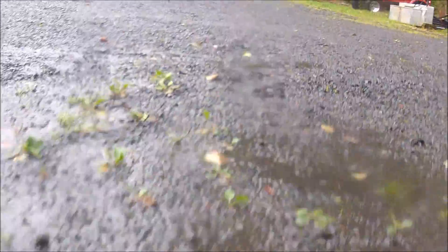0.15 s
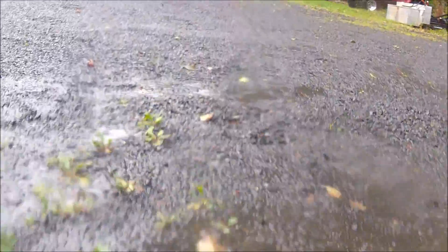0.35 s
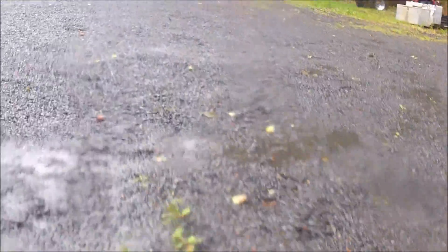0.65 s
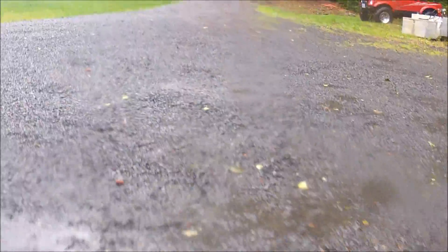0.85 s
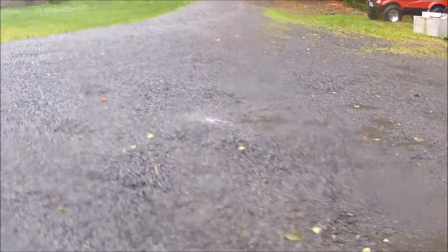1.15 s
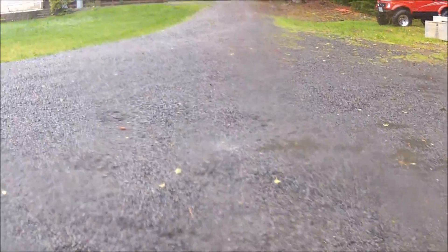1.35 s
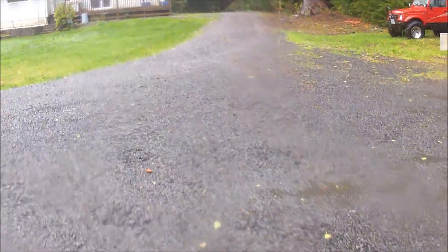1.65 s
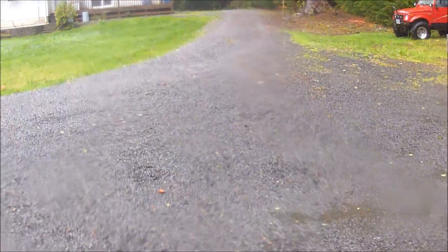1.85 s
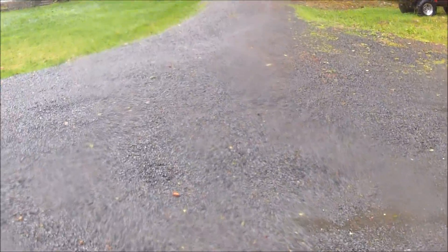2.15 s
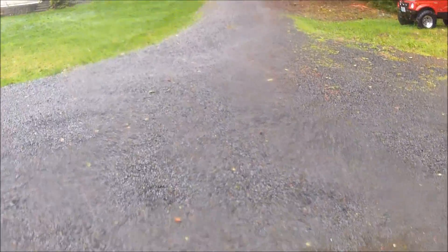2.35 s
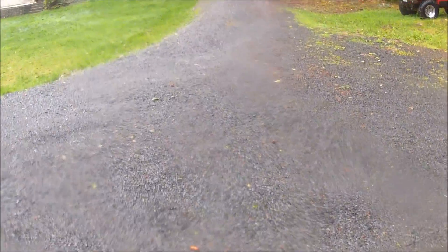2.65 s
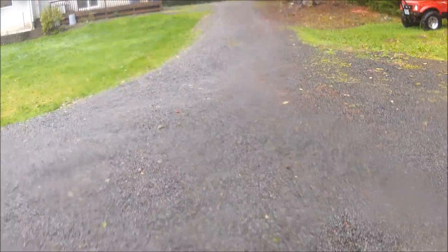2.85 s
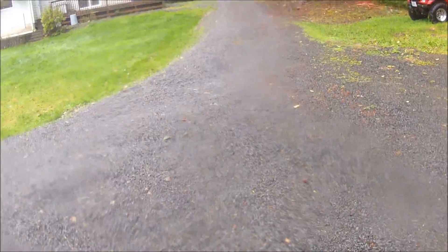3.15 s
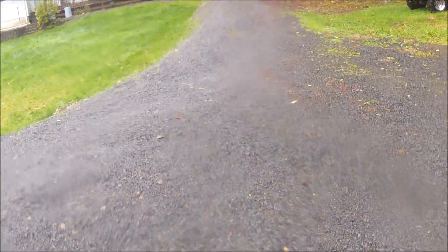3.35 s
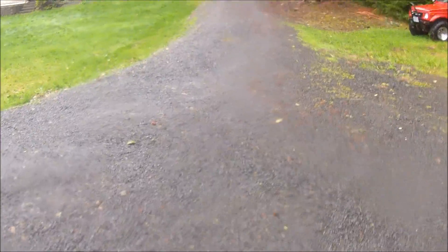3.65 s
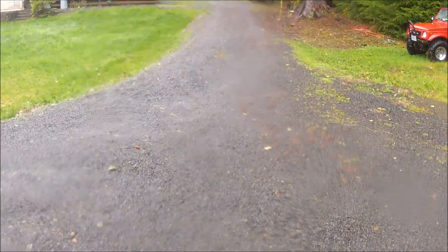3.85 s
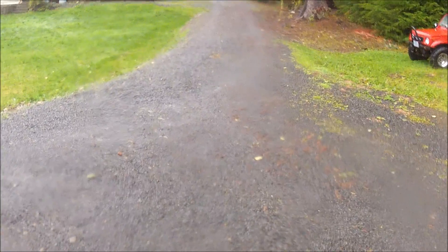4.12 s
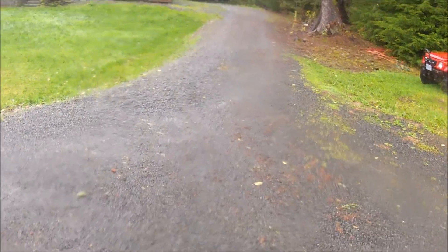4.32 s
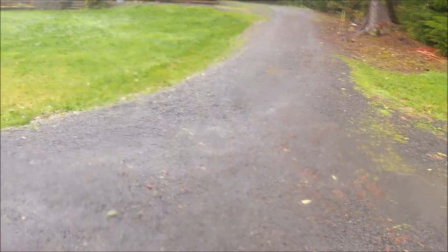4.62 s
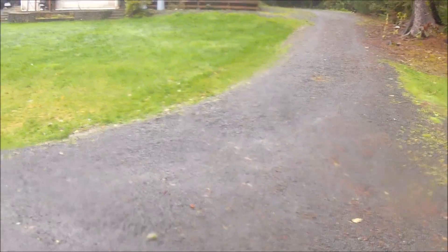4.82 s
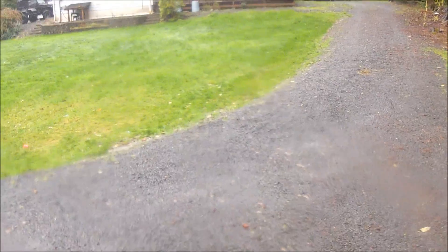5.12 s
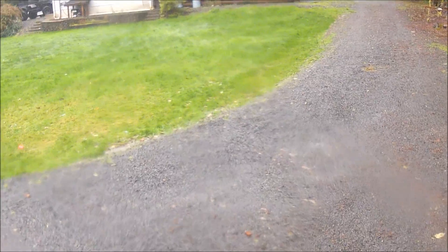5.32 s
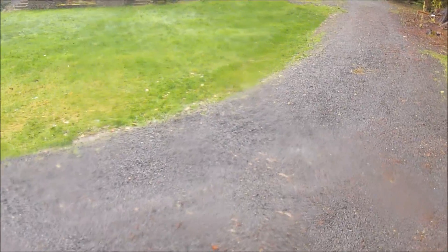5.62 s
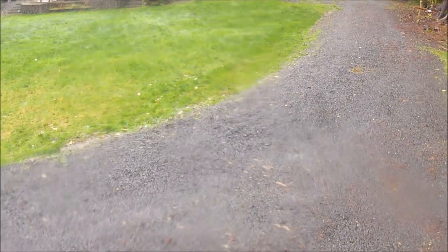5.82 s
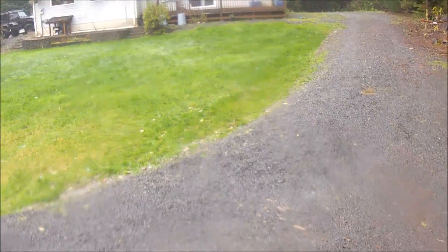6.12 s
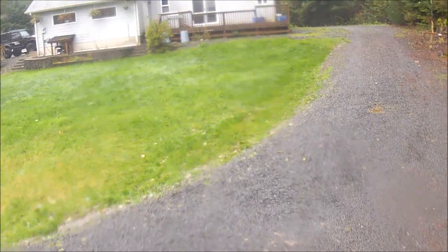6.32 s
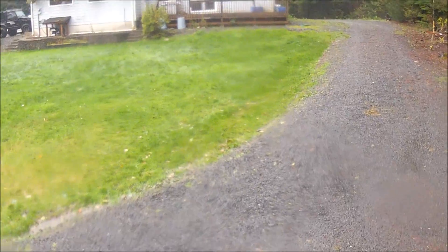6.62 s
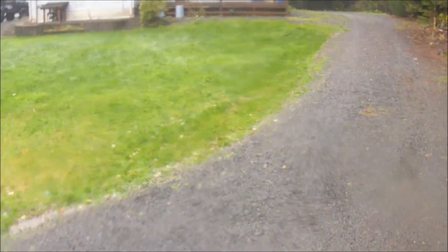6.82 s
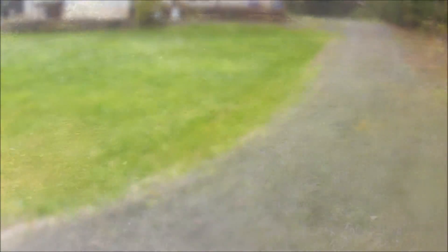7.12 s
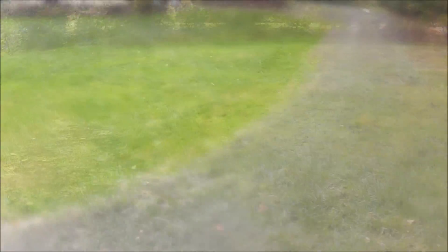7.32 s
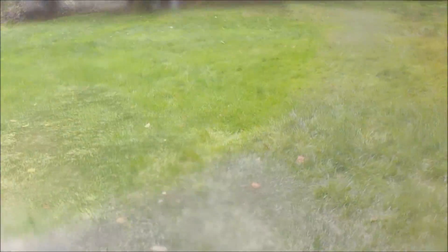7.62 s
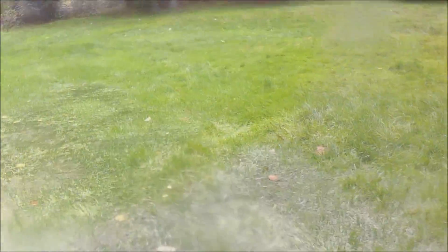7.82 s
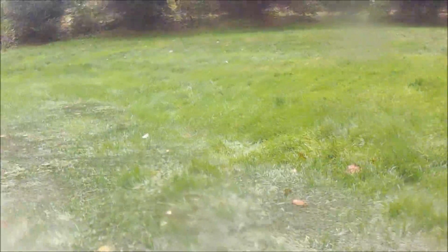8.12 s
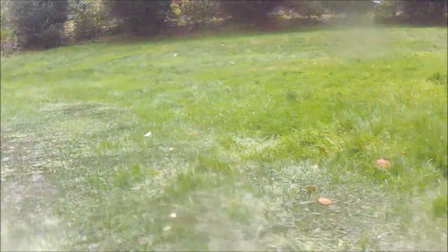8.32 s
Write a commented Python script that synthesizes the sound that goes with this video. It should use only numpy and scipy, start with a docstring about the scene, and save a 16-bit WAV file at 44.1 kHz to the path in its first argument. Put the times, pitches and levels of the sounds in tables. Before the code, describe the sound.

A small multirotor drone hums, rasps and whines right beside a tiny lo-fi microphone, its pitch wavering, then fades much quieter before lifting slightly.

```python
"""A small quadcopter hums, rasps and whines close by, heard through a tiny low-rate microphone.
Four rotors hum and beat against each other, and their blades chop noise into a rasp and a hiss.
Each motor whines at 42 times its turning rate; short corrections of tilt bend the pitch of the whines.
Holding each of 12000 samples a second mirrors the whine and the rasp into the treble."""
import sys
import numpy as np
from scipy import signal
from scipy.fft import rfft, irfft, next_fast_len
from scipy.io import wavfile
from scipy.ndimage import uniform_filter1d

SR = 44100
rng = np.random.default_rng(int(sys.argv[2]) if len(sys.argv) > 2 else 0)


def digitize_waveform(pressure):
    """Quantize a signal to 16-bit integers and store it at the path in sys.argv[1].

    Rows of a 2-D input are taken as channels; values are limited to [-1, 1].
    """
    field = np.atleast_2d(pressure).T
    bounded = np.clip(field, -1, 1)
    quanta = np.round(bounded * 32767).astype(np.int16)
    wavfile.write(sys.argv[1], SR, quanta)


N = 373527
TIME = np.arange(N) / SR   # s
WHINE_ORDER = 42   # whine cycles per turn of the rotor


def from_db(db):
    """Turn decibels into a gain."""
    return 10 ** (np.asarray(db) / 20)


def rms_one(x):
    """Scale a sound to an rms level of 1."""
    return x / np.sqrt(np.mean(x ** 2) + 1e-20)


def evened(x, seconds):
    """Hold the slow level of a sound near rms 1, leaving its faster swells."""
    power = uniform_filter1d(x * x, size=int(seconds * SR), mode="reflect")
    return x / np.sqrt(power + 1e-6)


def in_time(rows):
    """Read the columns of a timed table at every sample, with rounded corners."""
    seconds, *columns = np.transpose(rows)
    curves = [np.interp(TIME, seconds, column) for column in columns]
    return [uniform_filter1d(curve, size=1300, mode="nearest") for curve in curves]


def bump(top_s, length_s):
    """Rise smoothly to 1 at the given time and fall back, over the given length."""
    return np.interp(TIME, top_s + length_s * np.linspace(-.5, .5, 65), np.hanning(65))


def drift(rate):
    """Wander by chance with a spread of 1, mostly slower than the given rate in Hz."""
    step = 40   # samples between the drawn points
    r = np.exp(-2 * np.pi * rate * step / SR)
    draws = rng.standard_normal(N // step + 2002)
    slow = signal.lfilter([1], [1, -2 * r, r * r], draws)[2000:]   # skip the filter's start
    return np.interp(np.arange(N) / step, np.arange(len(slow)), rms_one(slow))


def coloured_noise(spectrum):
    """Steady noise whose strength at each pitch follows the given spectrum; rms 1."""
    size = next_fast_len(N)
    hz, db = np.transpose(spectrum)
    bins = np.maximum(np.arange(size // 2 + 1) * SR / size, 1)
    gain = from_db(np.interp(np.log(bins), np.log(hz), db))
    gain = gain / (1 + (bins / hz[-1] / 1.15) ** 16)   # fade out above the last row
    return rms_one(irfft(rfft(rng.standard_normal(size)) * gain, size)[:N])


def resonance(x, hz, width):
    """Ring like a two-pole resonator whose gain is 1 at its peak."""
    r = np.exp(-np.pi * width / SR)
    feedback = [1, -2 * r * np.cos(2 * np.pi * hz / SR), r * r]
    return signal.lfilter(np.array([1, 0, -1]) * (1 - r * r) / 2, feedback, x)


def tilt_corrections():
    """Extra speed of rotors A, B and C: each correction raises or lowers the speeds of some rotors."""
    # short corrections of tilt: (time of the top [s], length [s], extra of A, B, C [turns/s])
    tilts = [(0.14, 0.4, 5.4, -1.5, 0.7), (0.37, 0.33, 7.2, -1.0, 0.3), (0.62, 0.37, 6.2, -2.1, 0.7),
             (0.93, 0.58, 4.4, -1.6, 3.5), (1.28, 0.37, 5.4, -2.9, 1.5), (1.59, 0.49, 3.9, -1.2, 0.1),
             (1.97, 0.41, 3.8, 0.4, 1.4), (2.19, 0.35, 4.9, -0.4, -0.7), (2.53, 0.34, 0.0, 2.7, -3.9),
             (2.84, 0.36, 5.5, 1.1, -0.2), (3.15, 0.39, 6.7, -1.7, 1.3), (3.42, 0.31, 6.4, -1.5, 1.4),
             (3.66, 0.34, 5.7, 0.6, -1.1), (3.94, 0.28, 3.7, -0.9, -0.2), (4.23, 0.67, 4.6, -0.4, -0.3),
             (4.64, 0.48, 6.2, -4.1, -1.3), (5.99, 0.41, 2.0, -0.4, 0.5), (6.26, 0.34, 1.0, 0.4, 0.7),
             (6.58, 0.39, 1.3, -0.2, -0.9), (6.91, 0.39, 1.8, 0.3, 0.1), (7.14, 0.29, 2.2, 0.4, -0.3),
             (7.85, 0.3, 2.2, -0.1, 0.6), (8.05, 0.3, -1.5, 0.0, -0.4)]
    return sum(np.outer(extra, bump(top_s, length_s)) for top_s, length_s, *extra in tilts)


def rotor_speeds(extra):
    """Add the corrections to the cruising speeds; D shares the load and runs between A and B."""
    # cruising speed of the nearest rotor, A: (time [s], speed [turns/s])
    cruise_a = [(0.0, 82.4), (0.3, 85.2), (0.75, 81.9), (1.4, 82.9), (1.8, 80.8), (2.5, 81.4), (3.3, 81.7),
                (4.4, 82.5), (4.85, 80.6), (5.25, 81.6), (5.7, 85.7), (6.2, 86.5), (6.7, 84.8), (7.3, 84.7),
                (7.65, 89.5), (8.47, 91.9)]
    # cruising speed of the opposite rotor, B: (time [s], speed [turns/s])
    cruise_b = [(0.0, 87.2), (0.35, 82.5), (1.05, 84.9), (1.7, 81.0), (2.1, 83.4), (2.35, 75.2),
                (2.72, 73.6), (3.27, 83.1), (3.85, 79.1), (4.07, 81.3), (4.32, 72.7), (4.5, 77.5),
                (4.75, 73.5), (5.35, 82.9), (7.5, 80.9), (7.7, 85.4), (8.15, 81.9), (8.47, 83.6)]
    # cruising speed of rotor C: (time [s], speed [turns/s])
    cruise_c = [(0.0, 83.2), (0.73, 75.9), (1.15, 78.1), (1.4, 82.6), (2.05, 80.7), (2.72, 79.9),
                (3.1, 77.0), (4.05, 77.6), (4.72, 71.6), (5.12, 80.9), (5.4, 82.5), (5.88, 78.6),
                (6.45, 81.3), (7.5, 78.1), (8.47, 81.6)]
    cruises = (cruise_a, cruise_b, cruise_c)
    a, b, c = [in_time(cruise)[0] + more for cruise, more in zip(cruises, extra)]
    return a, b, c, (a + b) / 2 + .7 * drift(2)


def shaft_angle(speed, jitter):
    """Add up the turns of a rotor whose speed trembles in the gusts; angle in radians."""
    trembling = speed * (1 + jitter * drift(21.0))
    return 2 * np.pi * np.cumsum(trembling) / SR + rng.uniform(0, 2 * np.pi)


def tones(angles, table, flutter_db, sway):
    """Harmonics of all rotors; uneven inflow shakes the strength and timing of each rotor."""
    out = 0
    for rotor, angle in enumerate(angles):
        load = from_db(flutter_db * drift(8.9))
        shaken = angle + sway * drift(11)
        for order, *dbs in table:
            phase = rng.uniform(0, 2 * np.pi)
            out = out + load * from_db(dbs[rotor]) * np.sin(round(order) * shaken + phase)
    return out


def blade_hum(angles, direct_db):
    """Blade tones make the frame ring as they glide through its modes; the slow level is evened."""
    # blade hum: (multiple of the turning rate, relative level of rotor A, B, C, D [dB])
    blade_tones = [(2, -3, -8.5, -14, -11.5), (3, -8, -8, -13.5, -10.5), (4, -7, -8.5, -20.5, -12.5),
                   (5, -24.5, -19, -22.5, -18.5), (6, -21, -24, -27, -20)]
    # bending modes of the arms and body: (pitch [Hz], width [Hz], relative level [dB])
    frame = [(142, 106, -9), (250, 12.8, 2), (331.7, 25.6, -3), (394.6, 22, 1.5), (487, 16.3, 1.5)]
    thrust = tones(angles, blade_tones, flutter_db=1.0, sway=0.0064)
    ringing = sum(from_db(db) * resonance(thrust, hz, width) for hz, width, db in frame)
    return evened(from_db(direct_db) * thrust + ringing, seconds=0.08)


def shake(angles, second_db, far_db):
    """Unbalanced rotors rock the frame once a turn and beat against each other."""
    gains = from_db([0, second_db, far_db, far_db])
    rocking = sum(gain * np.sin(angle) for gain, angle in zip(gains, angles))
    return evened(rocking, seconds=0.17)


def drone(angles):
    """Blade hum and rocking of the frame, with swells and lulls at set times."""
    # slow level, before the trims below: (time [s], blade hum [dB], rocking [dB])
    drone_levels = [(0, -19.5, -26), (1.0, -19.5, -26), (1.8, -17, -25.5), (2.6, -17.5, -25),
                    (3.7, -19, -25.5), (4.4, -20, -30.5), (5.0, -20.5, -31.5), (5.55, -23, -29),
                    (6.0, -25, -34), (6.6, -30, -33.5), (7.5, -34, -43.5), (7.85, -33, -34.5),
                    (8.47, -31, -34)]
    # swells of the hum, as when blades fall into step: (time of the top [s], rise [dB])
    swells = [(.82, 4), (1.01, 3), (1.3, 3), (1.48, 1), (1.75, 3.5), (2.03, 3.5), (2.24, 0.5), (2.53, 3),
              (2.97, 2), (3.82, 7), (4.86, 4.5), (5.17, 5), (5.62, 3.5), (6.25, 3), (6.72, 5.5), (6.92, 3)]
    # lulls of the rocking, as when rotors pull against each other: (time of the middle [s], depth [dB])
    lulls = [(.68, 4), (.94, 5), (1.65, 2), (2.07, 18), (2.33, 11), (2.66, 4), (3.04, 2), (3.37, 9),
             (4.06, 6), (5.76, 14), (6.18, 10), (6.39, 11), (6.63, 8), (7.03, 7), (7.43, 11), (7.67, 9),
             (8.11, 8)]
    swell_s, lull_s = 0.16, 0.21   # length of each
    hum_db, shake_db = in_time(drone_levels)
    swell_db = sum(db * bump(top_s, swell_s) for top_s, db in swells)
    lull_db = sum(db * bump(middle_s, lull_s) for middle_s, db in lulls)
    hum = from_db(hum_db + swell_db - 0.3) * blade_hum(angles, direct_db=-7.0)
    rocking = from_db(shake_db - lull_db - 1.0) * shake(angles, second_db=2.0, far_db=-10.0)
    return hum + rocking


def mount_db(speed):
    """The near whine swells as its pitch glides through a resonance of its motor mount."""
    # motor mount: (pitch of the whine [Hz], gain [dB])
    mount = [(3380, -22.5), (3480, -10), (3550, -3), (3620, 2.5), (3710, -0.5), (3800, -4), (3900, -1)]
    return np.interp(WHINE_ORDER * speed, *np.transpose(mount))


def torque_db(speed):
    """A motor that speeds up draws more current and whines louder; one that slows whines softer."""
    db_per_turn_s2 = 0.06   # dB for each turn/s of speed gained per second
    return db_per_turn_s2 * np.gradient(speed) * SR


def whine(angle, wobble, flutter_db):
    """Tone from switching the motor coils; a slightly eccentric rotor swells it once a turn."""
    tone = np.sqrt(2) * np.sin(WHINE_ORDER * angle)
    return tone * (1 + wobble * np.cos(angle)) * from_db(flutter_db * drift(17.0))


def whines(speeds, angles, rasp_db, hiss_db):
    """The near motor whines through its mount; the other three are less steady."""
    # far motors, before trim and torque: (time [s], level of B [dB], level of C [dB])
    far_whine = [(0, -26, -35), (0.501, -32, -33), (1.0, -43, -35), (2.0, -32, -33), (2.75, -39, -33),
                 (3.25, -38, -36), (3.65, -34, -34.5), (4.2, -52, -36), (4.9, -35, -50), (5.8, -40, -44),
                 (6.3, -40, -42), (7.2, -44.5, -55), (8.47, -30.5, -39)]
    # the near whine takes this share of the rasp's level in dB
    near_trim_db, share = -3.5, 0.91
    near_db = near_trim_db + share * rasp_db + mount_db(speeds[0]) + torque_db(speeds[0])
    out = from_db(near_db) * whine(angles[0], wobble=0.028, flutter_db=0.98)
    for speed, angle, db in zip(speeds[1:], angles[1:], in_time(far_whine)):
        out = out + from_db(db - 1.0 + torque_db(speed)) * whine(angle, wobble=0.17, flutter_db=2.5)
    # the whine of D follows the level of the hiss
    return out + from_db(hiss_db + 1.0) * whine(angles[3], wobble=0.11, flutter_db=3.5)


def blade_chop(angles, per_turn, per_blade):
    """Air noise swells as each of the two blades passes an arm, one blade more than the other."""
    swell = sum(per_turn * np.cos(angle) + per_blade * np.cos(2 * angle) for angle in angles)
    return rms_one(np.exp(swell))


def bearing_hum(angles):
    """Motor and bearing tones at multiples of each turning rate shake the shell."""
    # motor and bearings: (multiple of the turning rate, relative level of rotor A, B, C, D [dB])
    bearing_tones = [(8, -24.5, -44, -51, -41), (9, -31.5, -35, -26.5, -30.5),
                     (11, -25.5, -21.5, -29.5, -24.5), (12, -16.5, -25, -30, -25),
                     (13, -22, -22, -19.5, -24.5), (14, -19.5, -21.5, -24, -20.5),
                     (15, -24.5, -21.5, -23, -22), (16, -21, -31, -38, -23.5), (20, -28.5, -37, -32, -19.5),
                     (21, -18.5, -30.5, -27.5, -30), (49, -25, -41, -43, -42), (52, -48, -40, -36, -44)]
    return from_db(2.5) * tones(angles, bearing_tones, flutter_db=4.0, sway=0.013)


def rasp(chop, bearings, coupling_db):
    """The shell rings with chopped air and, more, with bearing tones that come through the arms."""
    # air torn by the blades: (pitch [Hz], relative level per Hz [dB])
    torn_air = [(30, -21), (100, -9.5), (200, -6), (450, -6), (600, -15), (720, -6), (860, -7),
                (1020, -0.5), (1500, -1), (1900, 2.5), (2300, 0.5), (2750, -2.5), (3020, -12.5),
                (3300, -26)]
    # resonances of the shell: (pitch [Hz], width [Hz], gain [dB])
    shell = [(737, 76, -9.5), (1000, 36, -12.5), (1327, 57, 2), (1703, 126, 1.5)]
    air = coloured_noise(torn_air) * chop
    drive = air + from_db(coupling_db) * bearings
    ringing = sum(from_db(db) * resonance(drive, hz, width) for hz, width, db in shell)
    return rms_one(air + bearings + ringing)


def singing(angles, flutter_db):
    """Thin motor tones, at odd multiples of half the whine's pitch, swell near a shell resonance."""
    # thin tones: (multiple of the turning rate, to be rounded; resonance [Hz], width [Hz],
    # level of A, B, C relative to the rasp [dB])
    thin_tones = [(21, 1713, 170, -19, -9.5, -14.5), (62.96, 5370, 360, -27.5, -24.5, -40)]
    out = 0
    for order, hz, width, *dbs in thin_tones:
        drive = 0
        for angle, db in zip(angles, dbs):
            drive = drive + from_db(db + flutter_db * drift(7.1)) * np.sin(round(order) * angle)
        out = out + np.sqrt(2) * resonance(drive, hz, width)
    return out


def motor_hiss(chop, hiss_db, extra_a):
    """Noise around the motors, chopped by the blades; it softens when a correction speeds up A."""
    # hiss: (pitch [Hz], relative level per Hz [dB])
    hiss_spectrum = [(2700, -39), (3100, -12), (3350, -8.5), (3580, 1), (3930, -6), (4070, -8.5),
                     (4200, -13.5), (4350, -15.5), (4750, -21.5), (5350, -15.5), (5700, -20), (5950, -34)]
    trim_db, db_per_turn = 13, -0.26   # dB; dB for each extra turn/s of A
    level = from_db(hiss_db + trim_db + db_per_turn * extra_a)
    return level * coloured_noise(hiss_spectrum) * chop


def scene():
    """Four rotors drive the drone, the whines, the rasp, the thin tones and the hiss together."""
    # air noise of the propellers, before trims: (time [s], rasp level [dB], hiss level [dB])
    air_levels = [(0.0, -17, -39), (0.12, -22, -39.5), (0.33, -18, -38), (0.66, -19.5, -42),
                  (0.82, -18, -36.5), (0.89, -22, -39.5), (1.01, -19, -39.5), (2.43, -18, -40.5),
                  (4.06, -20, -40.5), (4.22, -22.5, -42.5), (4.43, -19.5, -42.5), (4.57, -23, -42.5),
                  (4.74, -20.5, -43.5), (5.31, -21.5, -45), (5.38, -22.5, -46), (7.5, -34.5, -54),
                  (8.42, -29, -51), (8.47, -29, -51)]
    rasp_db, hiss_db = in_time(air_levels)
    extra = tilt_corrections()
    speeds = rotor_speeds(extra)
    angles = [shaft_angle(speed, jitter=0.00035) for speed in speeds]
    low = drone(angles)
    whining = whines(speeds, angles, rasp_db, hiss_db)
    chop = blade_chop(angles, per_turn=0.071, per_blade=0.07)
    raspy = rasp(chop, bearing_hum(angles), coupling_db=6.5) + singing(angles, flutter_db=3.0)
    air = from_db(rasp_db + 0.02) * raspy
    return (low + whining + air + motor_hiss(chop, hiss_db, extra[0]))[None]


def record(dry):
    """Sample at a low rate and hold each sample: mirror images appear above 6 kHz. Then cut the top."""
    hold_hz, cutoff_hz = 12000, 15200
    ceiling = .88   # louder peaks are clipped
    # the low-pass runs at 40 times SR, the shared rate inside the resampler
    low_pass = signal.firwin(14701, 5850, fs=40 * SR)
    slow = signal.resample_poly(dry, hold_hz, SR, axis=-1, window=low_pass)
    steps = np.repeat(np.clip(slow, -ceiling, ceiling), 4, axis=-1)
    held = signal.resample_poly(steps, SR, 4 * hold_hz, axis=-1)[:, :N]
    top_cut = signal.ellip(12, .1, 80, cutoff_hz, fs=SR, output="sos")
    return signal.sosfilt(top_cut, held)


dry = scene()
out = record(dry)
digitize_waveform(out)
```